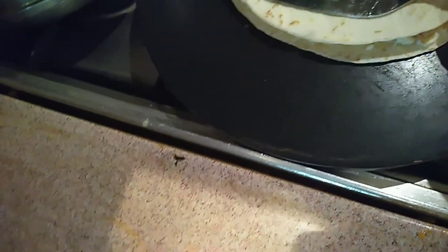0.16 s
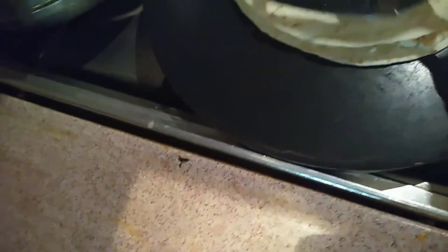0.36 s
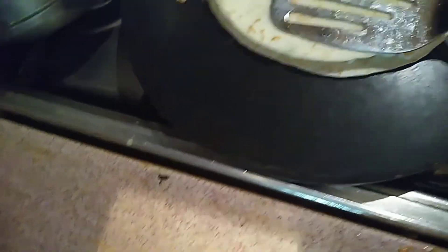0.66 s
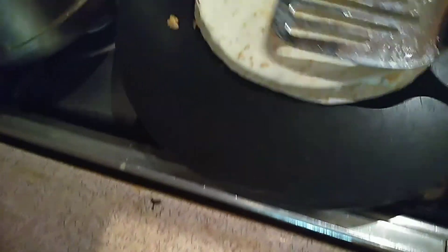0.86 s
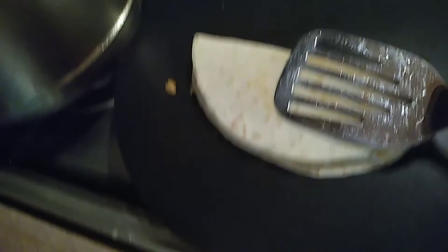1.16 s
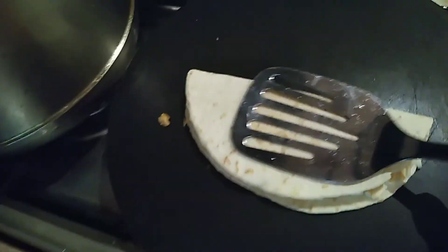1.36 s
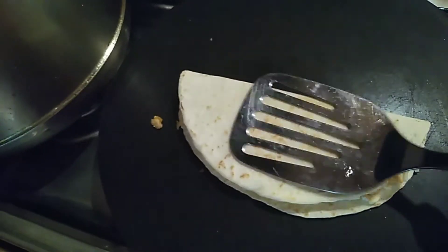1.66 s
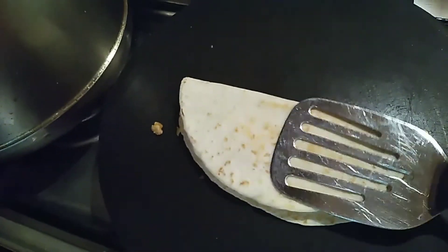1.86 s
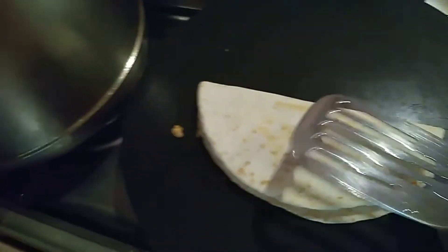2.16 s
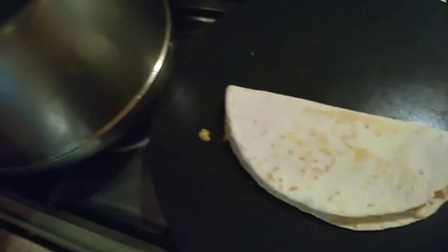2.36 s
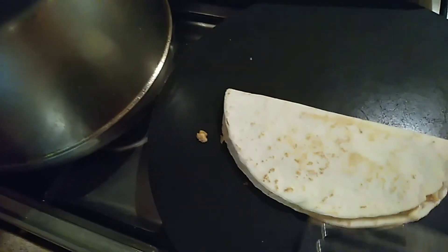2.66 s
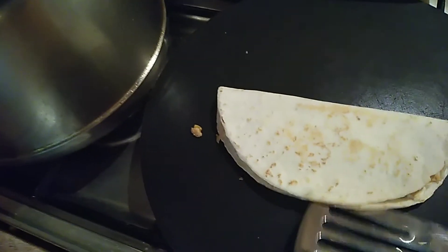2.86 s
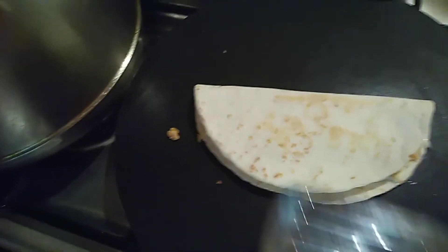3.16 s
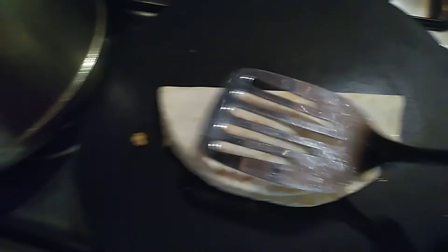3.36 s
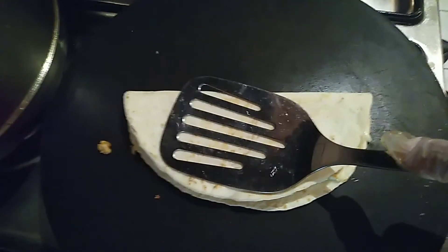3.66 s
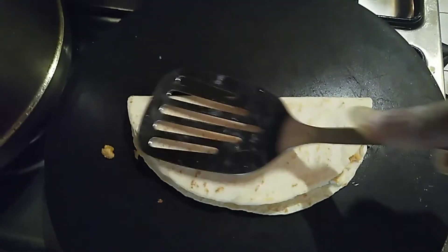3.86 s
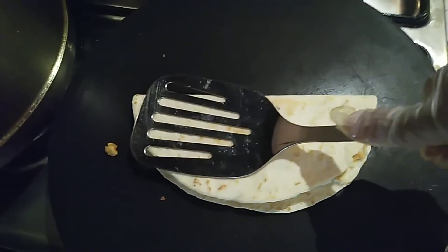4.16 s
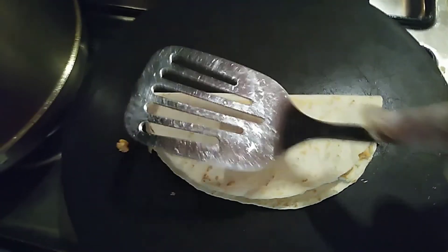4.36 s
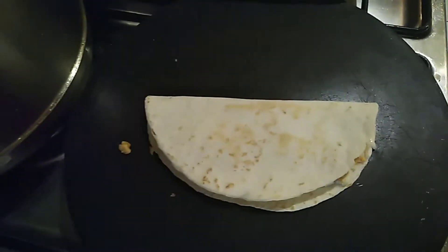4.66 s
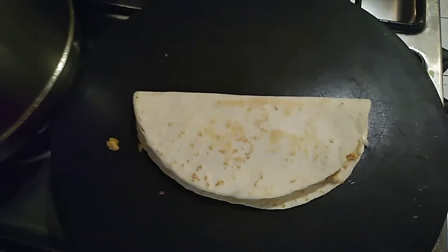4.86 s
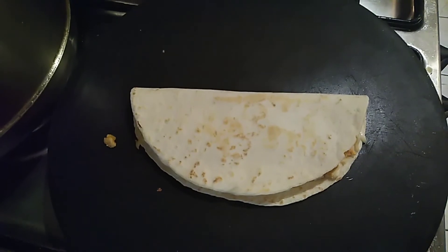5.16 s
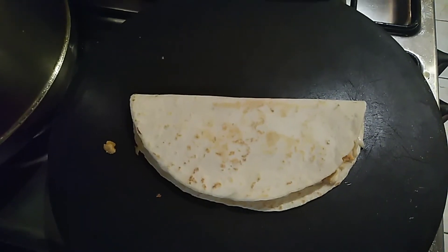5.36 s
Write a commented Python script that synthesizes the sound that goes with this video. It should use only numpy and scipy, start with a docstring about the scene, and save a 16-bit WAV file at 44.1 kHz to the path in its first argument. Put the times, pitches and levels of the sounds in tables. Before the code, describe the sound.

Brief metallic pats on crisp, crackling flatbread, one bright griddle knock, more pats, a pause, then a loud ringing spatula set-down.

```python
"""A slotted steel spatula pats a folded flatbread on a griddle, knocks and scrapes it, and is set down on the stove.
The blade is a bank of decaying modes: pats ring it briefly, knocks longer, scrapes drive it with gritty noise.
Three blows of setting down ring long steel modes over a dense clang; the handle ticks in short bursts of noise.
The dry crust cracks in clicks and grains, the heavy pan thuds on its stand in single modes.
A quiet kitchen hums as coloured noise and echoes the short sounds; one microphone, close by."""
import sys
import numpy as np
from scipy import signal
from scipy.fft import rfft, irfft
from scipy.io import wavfile
from scipy.ndimage import uniform_filter1d, map_coordinates

SR = 44100
rng = np.random.default_rng(int(sys.argv[2]) if len(sys.argv) > 2 else 0)


def ratio(d):
    """dB to gain"""
    e = np.asarray(d, float) / 20
    return 10 ** e


def wav_record(signal):
    """Record a signal, one row per channel, as 16-bit PCM in the file named by sys.argv[1]."""
    frames = np.transpose(np.atleast_2d(signal))
    bounded = np.clip(frames, -1, 1)
    # unit amplitude maps onto the largest positive 16-bit level
    quanta = np.round(bounded * 32767).astype(np.int16)
    wavfile.write(sys.argv[1], SR, quanta)


N = 242972
T = np.arange(N) / SR

# blade modes: [f/Hz]
BLADE_HZ = [580, 762, 928, 1095, 1130, 1246, 1400, 1660, 1771, 1857, 1915, 2056, 2520, 2610, 3180, 3345,
            3461, 3600, 4060, 4215, 4734, 5340, 5770, 6155, 6470, 6660]
# the same modes by excitation: [bread level/dB, griddle knock level/dB, scrape level/dB]
BLADE_LEVELS = [(-13.5, -12, -32), (-13, -18, -8), (-3, -60, -46), (-3.5, -54, -32), (-1, 1, -14),
                (-14, -25, -4.5), (1.5, 0.5, -12), (-12, -0.5, -16), (-9.5, 1.5, -2.5), (-5, 2, -22),
                (1, 1.5, -16), (-6.5, 0, -3), (-13.5, -30, 0), (3, 7, -10), (-26, -17, -3),
                (-12, -11, -7.5), (-36, 8.5, -15), (-11.5, -31, -27), (-42, -20, 3.5), (-17, 9, -2),
                (-38, 11.5, -1.5), (-6.5, 12, -10), (-3, -19, -5), (-36, 10, -8), (-30, -24, 3),
                (-27, -15, 0.5)]
# loud crust cracks: [t/s, peak level/dB]
CRACKS = [(0.0145, -29.5), (0.071, -30.5), (0.0758, -47), (0.1023, -13.5), (0.2956, -40), (.332, -43),
          (.386, -42), (0.4495, -29), (0.539, -31), (0.5934, -26), (0.6137, -24), (0.655, -38), (.660, -38),
          (0.849, -26), (0.9444, -24), (1.1727, -28), (1.255, -22.5), (1.815, -28.5), (1.926, -31),
          (1.965, -26), (2.019, -33.5), (2.4897, -20.5), (2.686, -25), (2.7775, -22.5), (3.3605, -32),
          (3.384, -29), (3.567, -33), (3.601, -22), (3.8969, -37.5), (3.9845, -45), (4.1226, -23),
          (4.2891, -31), (4.4657, -37.5), (4.7056, -42), (5.235, -41), (5.239, -36)]
# colour of the crackle: [f/Hz, weight/dB]
CRACKLE_COLOUR = [(1000, -25), (2300, -22), (3200, -10), (4500, -14.5), (6500, 5), (8000, -8.5),
                  (11000, -13), (15000, -13.5), (17000, -44)]


def colour(x, shape):
    """Weight a signal by (Hz, dB) points joined on a log axis; -90 dB outside them."""
    hz, db = np.transpose(shape)
    f = np.maximum(np.fft.rfftfreq(len(x), 1 / SR), 1)
    weight = ratio(np.interp(np.log(f), np.log(hz), db, -90, -90))
    return irfft(rfft(x) * weight, len(x))


def unit(x):
    """Scale to rms 1."""
    return x / np.sqrt(np.mean(x ** 2))


def peak(x, db):
    """Scale to a peak level."""
    return x * ratio(db) / np.max(np.abs(x))


def curve(rows):
    """Gain over time from (s, dB) rows, -150 dB outside them."""
    return ratio(np.interp(T, *np.transpose(rows), -150, -150))


def add(out, s, sound):
    """Mix a sound in at s seconds."""
    i = int(s * SR)
    out[i:i + len(sound)] += sound[:len(out) - i]


def fade(t60, length=.6):
    """Time axis and exponential decay, all in seconds."""
    t = np.arange(int(length * SR)) / SR
    return t, np.exp(-np.log(1000) * t / t60)


def smooth_noise(size):
    """Slowly wandering signal of rms 1: noise averaged twice over size samples."""
    once = uniform_filter1d(rng.standard_normal(N), size=size)
    return unit(uniform_filter1d(once, size=size))


def ring(hz, t60, db, scatter_db, waver=0.):
    """Modes set going together, weighed a little differently by each contact; rocking makes each swell and waver."""
    t = np.arange(int(.6 * SR)) / SR
    sign = rng.choice([-1, 1], len(hz))
    gain = ratio(db + scatter_db * rng.standard_normal(len(hz))) * sign
    rock = rng.standard_normal((len(hz), 40, 2)) @ [1, 1j]
    beat = 1 + waver * signal.resample(rock, len(t), axis=1) if waver else 1
    modes = np.imag(beat * np.exp(2j * np.pi * np.outer(hz, t)))
    decay = np.exp(-np.log(1000) * np.outer(np.ones(len(hz)) / t60, t))
    return gain @ (modes * decay)


def kitchen():
    """Steady house noise, wavering a little in level, with a deep rumble below."""
    # house noise: [f/Hz, weight/dB]
    house_colour = [(28, -63), (48, -0.5), (115, 1), (201, -6.5), (428, 1.5), (520, -3.5), (4520, -19.5),
                    (6350, -18), (8100, -28.5), (14900, -31), (16000, -56)]
    # rumble: [t/s, level/dB]
    rumble_level = [(0, -70.5), (.7, -72.5), (3.9, -77.5), (4.05, -65), (4.4, -66), (4.55, -75),
                    (5.52, -66)]
    air_db, waver_db = -67.5, 1.8
    air_gain = ratio(air_db + waver_db * smooth_noise(3000))
    air = unit(colour(rng.standard_normal(N), house_colour)) * air_gain
    rumble_colour = [(30, -45), (55, 29.0), (90, -17.0), (125, 15.5), (200, -52.0)]
    rumble = unit(colour(rng.standard_normal(N), rumble_colour))
    return air + rumble * curve(rumble_level)


def wall_echo(short):
    """Hard walls answer with decaying noise; a small random wander of the delay blurs its tones."""
    t60_s, level_db, onset_s, wander_s = 0.21, -8, 0.00099, .00015
    t, env = fade(t60_s)
    walls = rng.standard_normal(len(t)) * env * (1 - np.exp(-t / onset_s))
    walls = colour(walls, [(20, 9.0), (3000, -6.0), (8000, -3.5), (20000, -4.0)])
    echo = signal.fftconvolve(short, walls / np.sqrt(np.sum(walls ** 2)))[:N]
    wander = wander_s * smooth_noise(300)
    return ratio(level_db) * map_coordinates(echo, [(T - wander) * SR], mode="mirror")


def thuds():
    """The pan on its stand: one mode each, swelling in over a cycle and fluttering with the uneven contact."""
    # thuds: [t/s, level before flutter and decay/dB, f/Hz, t60/s]
    pan_thuds = [(.97, -42.5, 134, 0.059), (1.87, -35.5, 128.6, 0.071), (1.969, -49, 362.5, 0.22),
                 (2.024, -46, 355, 0.057), (2.09, -37, 378, 0.024), (2.608, -42.5, 497, 0.052),
                 (3.577, -36, 111, 0.1), (3.599, -44.5, 225, 0.078), (4.39, -44.5, 298, 0.036),
                 (4.433, -44, 290, 0.042), (4.994, -30.5, 151, 0.055), (5.112, -38.5, 946, 0.042),
                 (5.338, -25.5, 105.9, 0.34)]
    out = np.zeros(N)
    for s, db, hz, t60 in pan_thuds:
        t, env = fade(t60)
        uneven = uniform_filter1d(rng.standard_normal(len(t)), size=int(2 * SR / hz))
        flutter = 1 + 0.5 * unit(uneven)
        swell = 1 - np.exp(-t * hz)
        add(out, s, ratio(db) * flutter * np.sin(2 * np.pi * hz * t) * env * swell)
    return out


def crust_cracks():
    """Each crack is a split of under a millisecond: a click with a short noisy tail."""
    small_per_s, small_floor_db, small_spread_db = 14, -52.5, 2.2  # faint cracks at random moments
    tail_s = .0006  # time constant
    out = np.zeros(N)
    t = np.arange(-128, 384) / SR
    when, size = rng.random((int(small_per_s * N / SR), 2)).T
    small = zip(0.0038 + when * (T[-1] - .02), small_floor_db - small_spread_db * np.log(size))
    for s, db in [*CRACKS, *small]:
        tail = rng.standard_normal(len(t)) * (t > 0) * np.exp(-np.abs(t) / tail_s)
        split = (t == 0) + 0.28 * tail
        add(out, s + t[0], peak(colour(split, CRACKLE_COLOUR), db))
    return out


def crust_grains():
    """Fine crust splits: sparse random impulses of either sign and uneven size."""
    per_s, spread_db = 1500, 4
    hit = rng.random(N) < per_s / SR
    size = ratio(spread_db * np.minimum(rng.exponential(size=N), 5))
    return hit * size * rng.choice([-1, 1], N)


def crust_rustle(grains):
    """Soft swells of fine crackling, grains over a little noise."""
    # swells: [centre t/s, level/dB, half length/s]
    swells = [(0.152, -55.5, 0.077), (0.542, -58, 0.085), (0.65, -56.5, 0.033), (0.837, -59.5, 0.024),
              (1.647, -58, 0.016), (2.164, -56, 0.016), (3.024, -56.5, 0.023), (3.388, -62, 0.044),
              (3.633, -59.5, 0.11), (3.962, -58, 0.068), (4.158, -58, 0.037)]
    noise = unit(colour(rng.standard_normal(N), CRACKLE_COLOUR))
    rustle = unit(unit(colour(grains, CRACKLE_COLOUR)) + 0.16 * noise)
    return rustle * sum(ratio(db) * np.exp(-((T - s) / half) ** 2) for s, db, half in swells)


def crust_fizz(grains):
    """Every loud crack leaves a brighter fizz that dies away; louder cracks fizz only partly louder."""
    # fizz: [f/Hz, weight/dB]
    fizz_colour = [(2500, -28), (5000, -3.5), (6500, 0.5), (9000, 0.5), (15000, -15), (17000, -25)]
    base_db, db_per_crack_db, t60_s = -36, 0.73, 0.15
    level = np.zeros(N)
    for s, db in CRACKS:
        add(level, s, ratio(base_db + db_per_crack_db * db) * fade(t60_s)[1])
    return unit(colour(unit(grains) + rng.standard_normal(N), fizz_colour)) * level


def crust():
    """The dry crust: cracks, and fine grains that follow them and fill in."""
    grains = crust_grains()
    return crust_cracks() + crust_rustle(grains) + crust_fizz(grains)


def ticks():
    """Handle ticks: a short rough burst of noise around one pitch, fading off to either side."""
    # ticks: [t/s, peak level/dB, f/Hz]
    handle_ticks = [(.537, -33.5, 4430), (.547, -34.5, 4430), (.570, -44, 2060), (.586, -47, 2060),
                    (.608, -41, 2060), (.624, -46, 2050), (.654, -45, 2040), (.689, -48.5, 2040)]
    out = np.zeros(N)
    t, env = fade(.025, 0.091)
    for s, db, hz in handle_ticks:
        pitch = [(0.76 * hz, -24), (hz, 0), (1.34 * hz, -22), (1.2 * hz, -15), (3 * hz, -30)]
        burst = colour(rng.standard_normal(len(t)), pitch)
        add(out, s, peak(burst * env, db))
    return out


def dense_clang(weak, db, t60):
    """Many weak steel modes: narrow bands and noise dying away, the treble first."""
    # dense clang: [f/Hz, weight/dB]
    clang_colour = [(88, -17), (150, -16), (675, -13), (1690, -10), (4160, -20.5), (4410, -14),
                    (6020, -14.5), (16000, -34)]
    noise_share = .9
    treble_hz, treble_t60_s = 6060, 0.79  # this decay comes on top of the clang's own
    t, env = fade(t60)
    lines = unit(irfft(weak * rfft(rng.standard_normal(len(t))), len(t)))
    mixed = lines + noise_share * rng.standard_normal(len(t))
    dense = ratio(db) * unit(colour(mixed, clang_colour)) * env
    top = signal.sosfilt(signal.butter(2, treble_hz, "high", fs=SR, output="sos"), dense)
    return dense - top * (1 - fade(treble_t60_s)[1])


def set_down():
    """Blows on the stove: long steel modes over a dense clang, both damped as the spatula comes to rest."""
    # stove steel modes: [f/Hz]
    steel_hz = [930, 1090, 1715, 2492, 2732, 2915, 3640, 4371, 4544, 4990, 5078, 5577, 5825, 6051, 6200,
                6460, 6850, 7440, 7810, 8123, 9991, 11880]
    # the same modes: [t60/s, first blow level/dB, second blow level/dB, third blow level/dB]
    steel_modes = [(0.18, -58, -20.5, -27), (0.2, -68, -25, -29), (0.067, -38, -15.5, -33),
                   (0.58, -44, -32, -50), (0.64, -36.5, -31, -31.5), (0.88, -39, -64, -59),
                   (0.67, -38, -32, -49), (0.95, -33.5, -57, -52), (0.56, -37, -42, -21.5),
                   (0.2, -34, -39, -24), (0.9, -25.5, -46, -25.5), (1, -35.5, -46, -47),
                   (1, -40.5, -13.5, -32), (0.48, -31, -39, -23), (0.18, -35, -34, -8),
                   (0.47, -53, -32, -28), (1, -34, -54, -33.5), (0.47, -39, -51, -29),
                   (0.56, -38, -24, -30), (0.45, -36.5, -41, -41), (0.24, -40.5, -58, -37),
                   (0.3, -49, -66, -48)]
    # blows: [t/s, rise/ms, settling time/s, dense clang level before damping/dB, its t60/s, rocking 0-1]
    blows = [(4.987, 3.5, 0.15, -29, 0.95, 0.6), (5.325, 2.3, 0.055, -18.5, 0.63, 0.27),
             (5.347, 6.9, 0.16, -24.5, 0.8, 0.39)]
    ring_left = .1  # share still ringing once settled
    t60, *blow_db = np.transpose(steel_modes)
    bins = len(fade(1)[0]) // 2 + 1
    # scattered weak modes, each a narrow wavering band
    weak = uniform_filter1d((rng.random(bins) < .03) * rng.exponential(size=bins), size=5)
    out = np.zeros(N)
    for (s, rise_ms, settle_s, dense_db, dense_t60, rocking), db in zip(blows, blow_db):
        t = fade(dense_t60)[0]
        rise = 1 - np.exp(-1000 * t / rise_ms)
        damping = ring_left + (1 - ring_left) * np.exp(-(t / settle_s) ** 4)
        steel = ring(steel_hz, t60, db, 0.36, rocking)
        add(out, s, rise * damping * (steel + dense_clang(weak, dense_db, dense_t60)))
    return out


def stroke(s, db, length):
    """Pressure of one stroke: a rounded top, falling steadily in dB on both sides."""
    slope_db, roundness, linger = -17.5, 0.7, 0.99  # slope per length; linger scales the length of the fall
    away = (T - s) / length / np.where(T > s, linger, 1)
    fall = np.hypot(away, roundness) - roundness
    return ratio(np.maximum(db + slope_db * fall, -150))


def scrapes():
    """The edge skips over the rough iron: gritty noise rings the blade and rasps beside it."""
    # strokes: [t of most pressure/s, pressure/dB, length/s]
    strokes = [(0, -46.5, 0.018), (0.113, -53, 0.068), (2.717, -35.5, 0.049), (2.919, -63.5, 0.025),
               (3.008, -60.5, 0.034)]
    blade_t60_s, blade_share, rasp_share = .07, 1.18, .55
    grit = rng.laplace(size=N)
    rasp = unit(colour(grit, [(700, -35), (1500, -7.5), (7000, -12.5), (9000, -16.5), (16000, -35)]))
    pressure = sum(stroke(*row) for row in strokes)
    bite = (pressure / pressure.max()) ** 0.32  # light strokes only hiss, firm ones ring the blade
    blade = ring(BLADE_HZ, blade_t60_s, np.transpose(BLADE_LEVELS)[2], 0.9)
    ringing = unit(signal.fftconvolve(grit, blade)[:N])
    return (blade_share * bite * ringing + rasp_share * rasp) * pressure


def knocks():
    """Blade against the griddle: all its modes ring, the higher ones shorter, over noise for the weak modes."""
    # knocks: [t/s, peak level/dB, t60 at 2 kHz/s (short when the bread damps it)]
    griddle_knocks = [(2.509, -17, 0.35), (3.526, -25.5, 0.047), (3.53, -24.5, 0.031)]
    weak_colour = [(700, 6.0), (1500, 8.5), (7000, 16.0), (9000, 4.0), (16000, -13)]
    weak_share, beat_depth = 1.3, .45
    level_db = np.transpose(BLADE_LEVELS)[1]
    out = np.zeros(N)
    for s, db, t60 in griddle_knocks:
        t, env = fade(t60)
        weak_modes = colour(rng.standard_normal(len(t)), weak_colour) * env
        mode_t60 = t60 * (2000 / np.array(BLADE_HZ)) ** 0.58
        clang = ring(BLADE_HZ, mode_t60, level_db, 0.62, beat_depth) + weak_share * weak_modes
        add(out, s, peak(clang, db))
    return out


def contacts():
    """Every touch of blade on bread as (s, peak dB, contact ms): the leading edge of firm pats, then the bounces."""
    # pats: [t/s, peak level/dB, contact/ms, bounces (rounded), gap between bounces/s, change per bounce/dB]
    bread_pats = [(0.01, -41.5, 0.22, 1.096, 0, 0), (0.096, -40, 0.022, 1.955, 0.025, 2.5),
                  (0.458, -25.5, 0.081, 2.01, 0.036, -6.5), (0.948, -23, 0.063, 3.01, 0.016, 1),
                  (1.356, -25, 0.1, 2.09, 0.014, 2.5), (1.824, -23, 0.097, 3.06, .0155, -1),
                  (2.071, -33.5, 0.33, 3, .0205, -4.5), (3.554, -32, 0.13, 1.01, 0, 2),
                  (3.578, -28.5, 0.036, 3.64, 0.013, 0.34), (3.732, -41.5, 0.25, 0.89, 0, -3)]
    firm_db = -27.5  # louder pats are firm: the blade's edge lands just ahead
    edge_lead_s, edge_db, edge_ms = 0.0078, -14, 0.011  # edge level is relative to the pat
    rows = [(s - edge_lead_s, db + edge_db, edge_ms) for s, db, *_ in bread_pats if db > firm_db]
    for s, db, ms, count, gap, step_db in bread_pats:
        rows += [(s + k * gap, db + k * step_db, ms) for k in range(round(count))]
    return rows


def pats():
    """Blade on bread: modes ring briefly beside a slap of noise, both smoothed by the push of the contact."""
    t60_s, slap_share = .054, .45
    slap_colour = [(150, 0.0), (700, 12), (5000, 8.5), (9000, 2.5)]
    level_db = np.transpose(BLADE_LEVELS)[0]
    out = np.zeros(N)
    t, slap_env = fade(0.094)
    push_t = np.arange(256) / SR
    give = 1 - np.exp(-t / 0.0011)  # the soft bread yields before the blade rings
    for s, db, contact_ms in contacts():
        push = push_t * np.exp(-2000 * push_t / contact_ms)  # a longer push feeds the treble less
        # the flexed blade is never tuned the same twice
        bent_hz = BLADE_HZ * (1 + 0.0063 * rng.standard_normal(len(BLADE_HZ)))
        slap = slap_share * colour(rng.standard_normal(len(t)), slap_colour) * slap_env
        touch = give * (ring(bent_hz, t60_s, level_db, 2.44, .25) + slap)
        add(out, s, peak(np.convolve(touch, push), db))
    return out


def scene():
    """Near sources, the echo of the short ones off the hard kitchen walls, and the background."""
    short = pats() + knocks() + scrapes() + thuds() + ticks() + crust()
    mix = short + wall_echo(short) + set_down() + kitchen()
    return np.tile(mix, (2, 1))


def low_pass(x):
    """Removes everything above the highest recorded frequency."""
    return signal.sosfilt(signal.butter(12, 16810, fs=SR, output="sos"), x)


def record(dry):
    """One microphone on both channels, its lowest bass rolled off below 35 Hz."""
    mix = signal.sosfilt(signal.butter(2, 35, "high", fs=SR, output="sos"), dry)
    return low_pass(mix)


dry = scene()
out = record(dry)
wav_record(out)
```